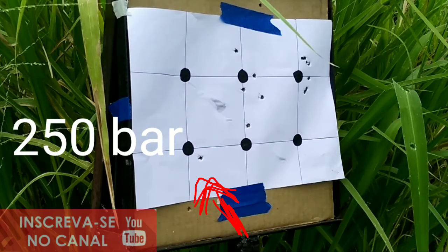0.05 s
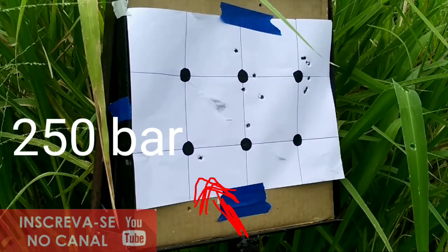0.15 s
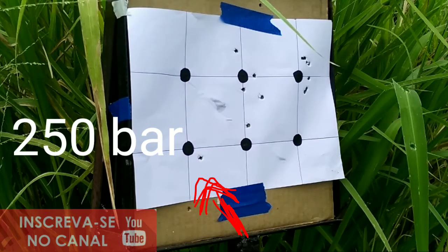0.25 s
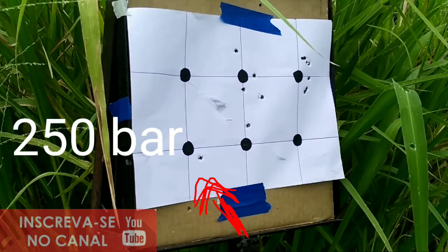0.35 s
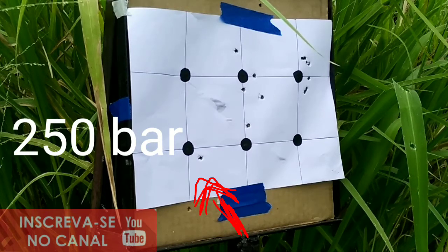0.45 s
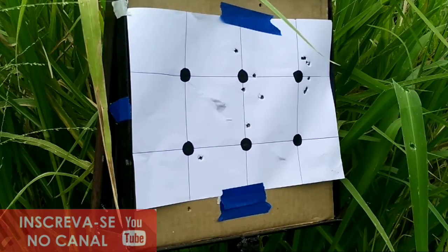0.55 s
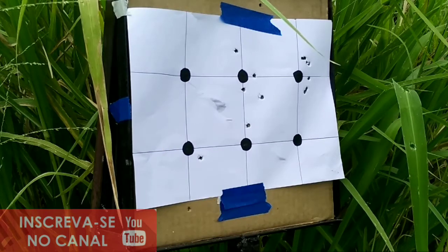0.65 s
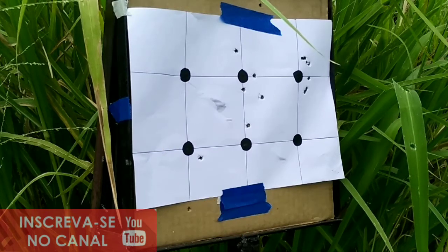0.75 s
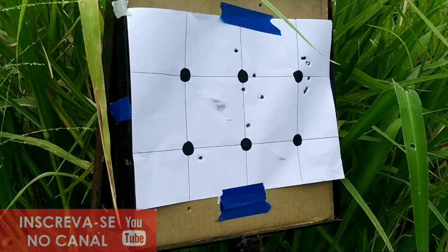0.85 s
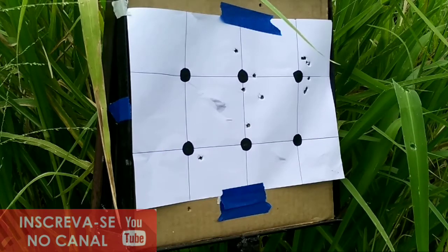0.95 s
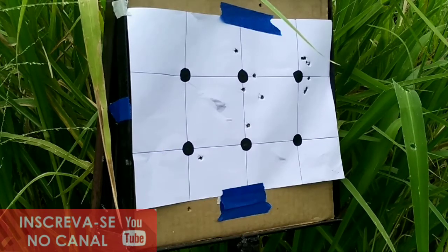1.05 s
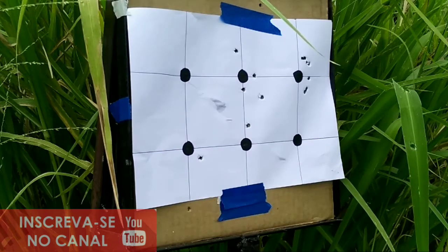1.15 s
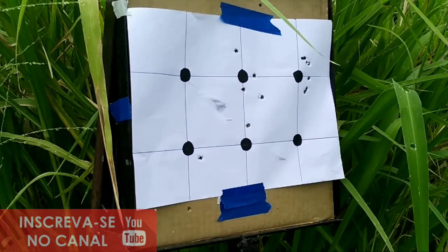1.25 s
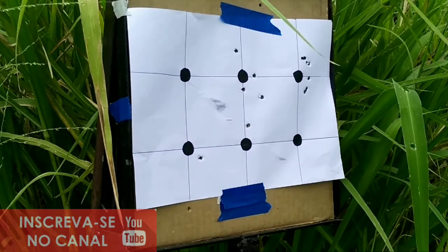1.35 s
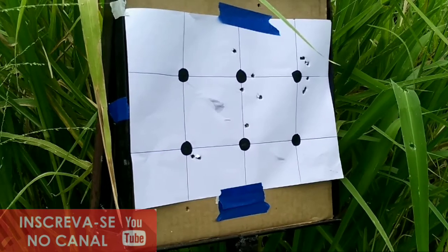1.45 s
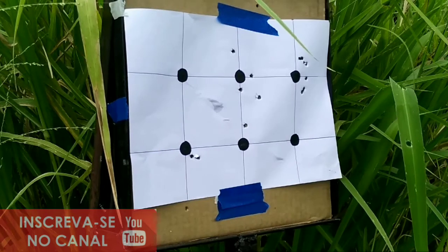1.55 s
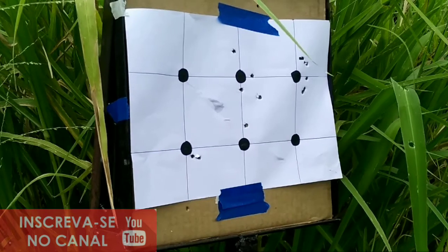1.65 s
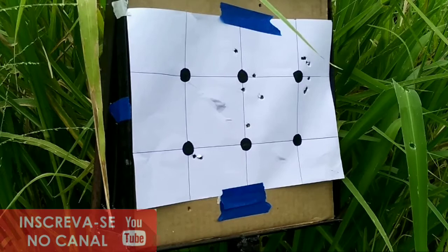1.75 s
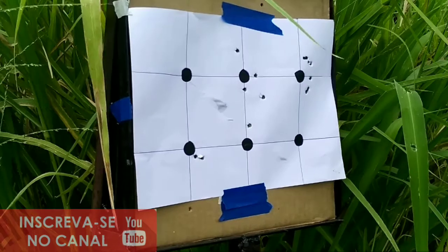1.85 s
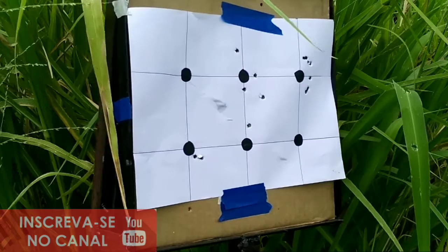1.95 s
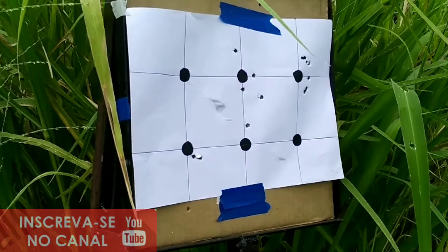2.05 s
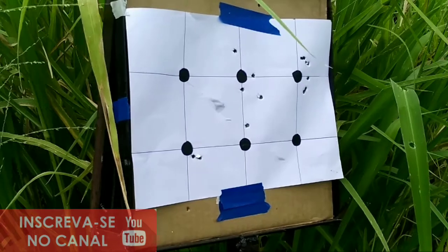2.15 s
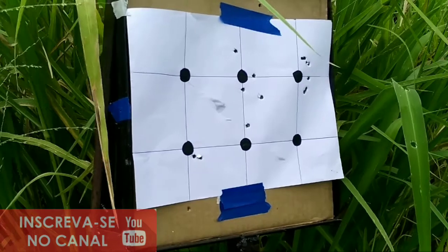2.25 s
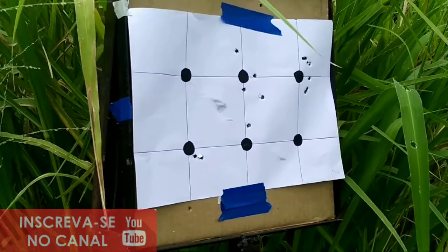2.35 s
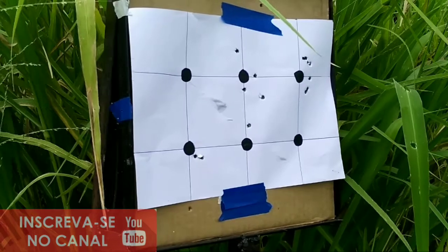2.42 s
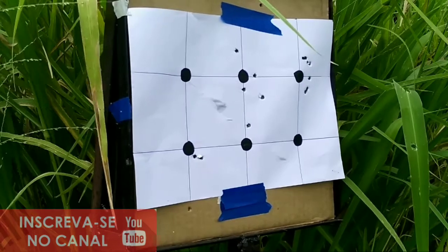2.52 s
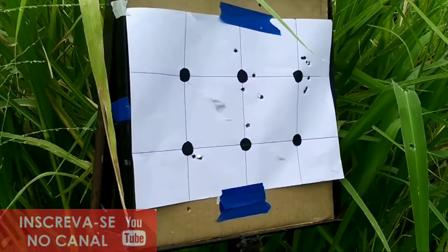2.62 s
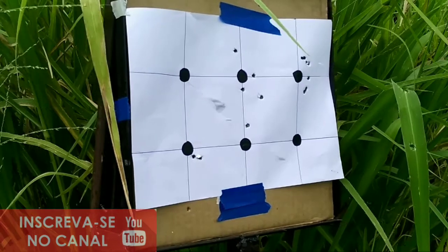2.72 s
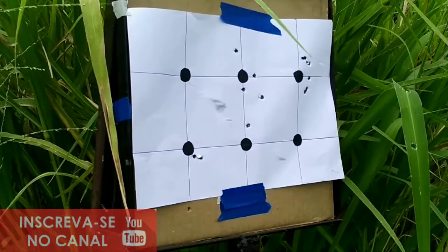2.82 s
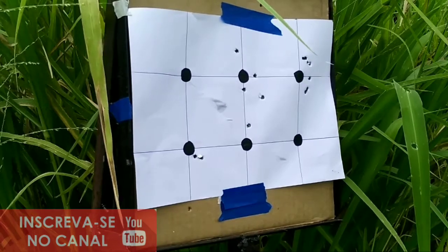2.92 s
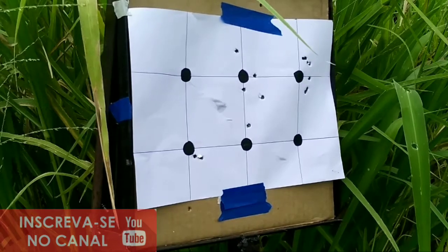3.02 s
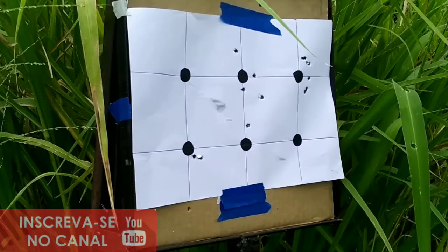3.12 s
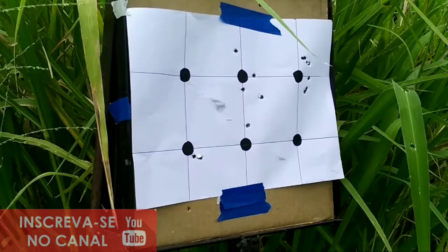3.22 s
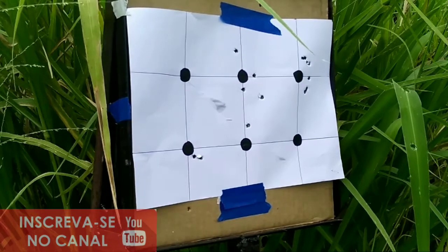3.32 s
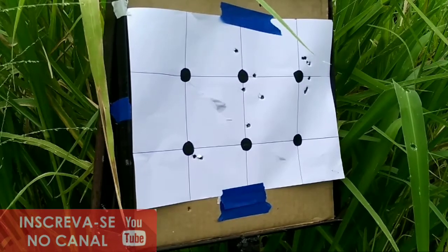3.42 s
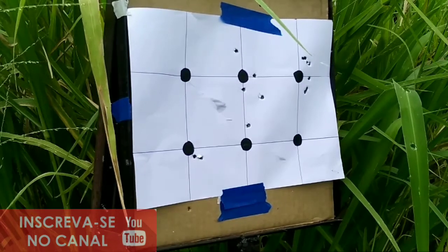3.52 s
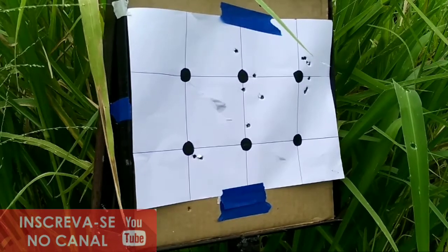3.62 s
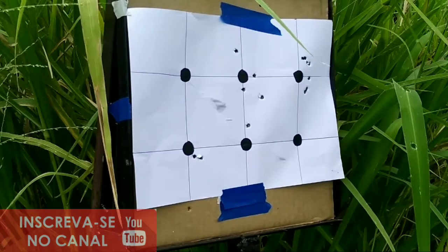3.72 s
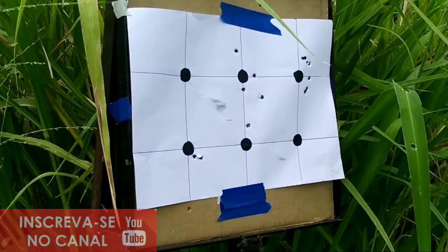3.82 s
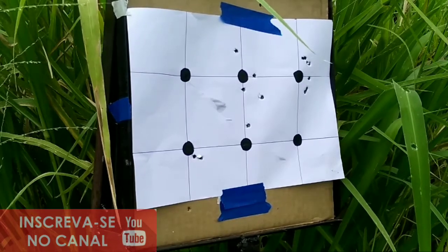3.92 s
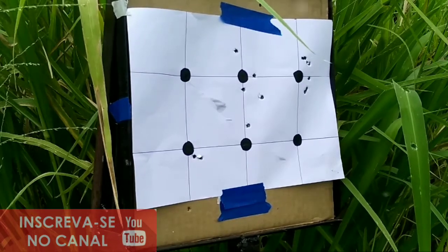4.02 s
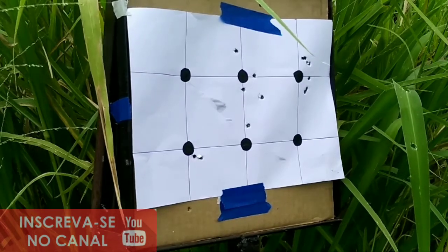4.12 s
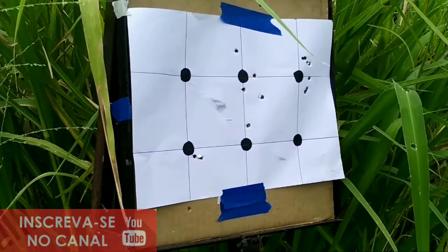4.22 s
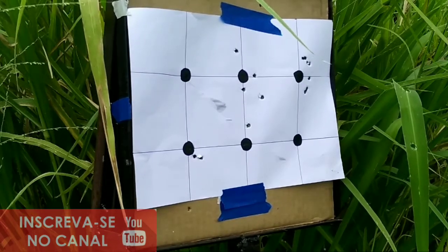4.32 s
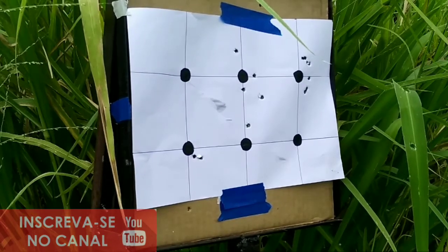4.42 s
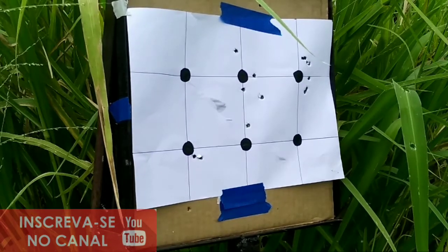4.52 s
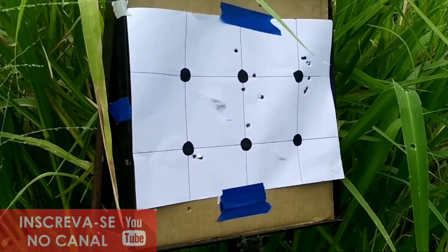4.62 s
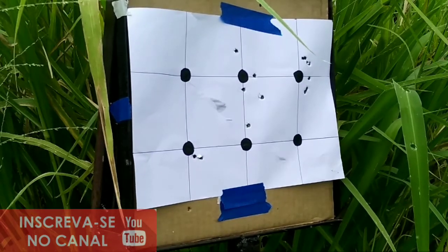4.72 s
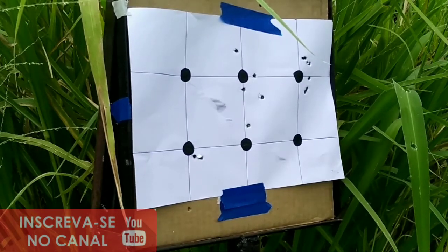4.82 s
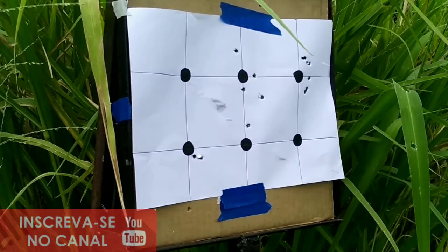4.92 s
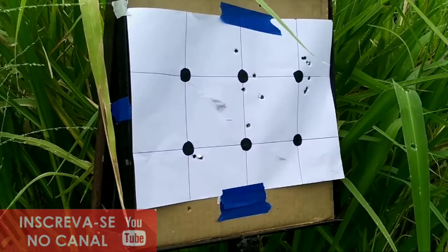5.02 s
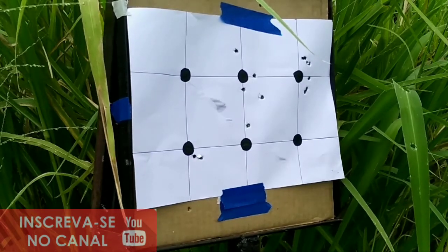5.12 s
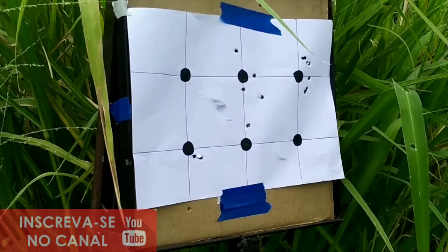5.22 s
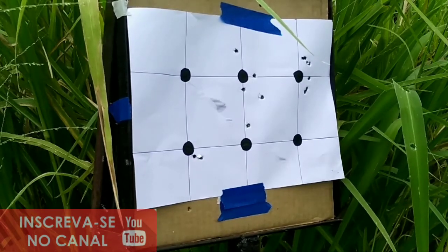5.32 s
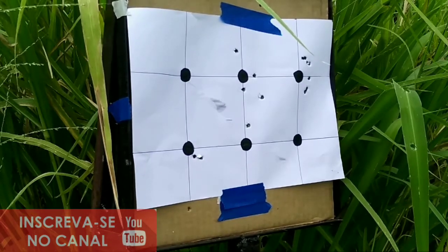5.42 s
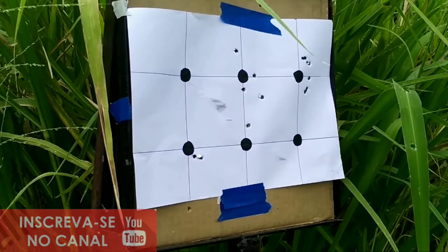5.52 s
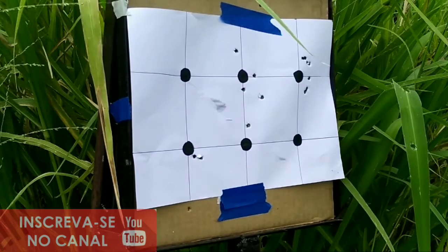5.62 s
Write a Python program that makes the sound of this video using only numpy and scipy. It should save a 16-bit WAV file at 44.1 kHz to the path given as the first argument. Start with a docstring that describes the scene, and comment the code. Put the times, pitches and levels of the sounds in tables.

```python
"""An air-rifle shot in tall grass, from one microphone beside the paper target. Light wind rumbles,
insects chirr in swells and far birds call throughout. About 1.4 s in, the report arrives from the
muzzle; the slower pellet hisses past the microphone, smacks through paper and cardboard and sets a
metal support ringing. Bits patter down as the near grass, then the far trees, answer."""
import sys
import numpy as np
from scipy.fft import rfft, irfft, next_fast_len
from scipy.io import wavfile
from scipy.ndimage import map_coordinates

SR = 44100
rng = np.random.default_rng(int(sys.argv[2]) if len(sys.argv) > 2 else 0)


def wav_out(sig):
    """Save sig, one row per channel (or a flat mono array), as 16-bit PCM at SR to the path in sys.argv[1]."""
    wavfile.write(sys.argv[1], SR, np.round(np.clip(np.atleast_2d(sig).T, -1, 1) * 32767).astype(np.int16))


N = 250047
TIME = np.arange(N) / SR
HIT_S = 1.4995  # the pellet reaches the target

# The report and its sharp near reflections. Each row: start in seconds, level in dB, hold and t60
# in seconds.
CRACKS = [(1.4318, -9, 0.00065, .004), (1.4336, -6, 0.0028, 0.023), (1.4513, -7, 0.00032, 0.0016),
          (1.4557, -16, 0.00033, .004)]
# The spectrum of paper and grass ticking. Each row: frequency in Hz, relative level in dB.
TICK_COLOUR = [(1000, -16), (6000, -18.5), (8700, -3), (11000, -5), (15000, -14)]


def amp(db):
    """Decibels to gain."""
    return 10 ** (np.asarray(db) / 20)


def unit(x):
    """Scale to rms 1."""
    return x / np.sqrt(np.mean(x ** 2) + 1e-20)


def curve(rows):
    """Rows of seconds and value, as one value per sample."""
    return np.interp(TIME, *np.transpose(rows))


def wobble(rate):
    """A smooth random curve, rate knots a second."""
    return map_coordinates(rng.standard_normal(int(N * rate / SR) + 4), [TIME * rate], order=2)


def filtered(x, response):
    """Filter x by a response, a function of frequency in Hz."""
    size = next_fast_len(N + 8192)
    return irfft(rfft(x, size) * response(np.fft.rfftfreq(size, 1 / SR)), size)[:N]


def noise(colour):
    """Noise of rms 1. Each row of colour: frequency in Hz, relative level in dB."""
    hz, db = np.transpose(colour)
    white = rng.standard_normal(N)
    return unit(filtered(white, lambda f: amp(np.interp(np.log(f + 1), np.log(hz), db))))


def burst(start, rise, hold, t60):
    """An envelope that rises, holds and dies away; all times in seconds."""
    age = np.maximum(TIME - start, 0)
    return (1 - np.exp(-age / rise)) * np.exp(-np.log(1000) * np.maximum(age - hold, 0) / t60)


def ring(start, hz, db, t60, rise=.003):
    """One struck mode, slightly unsteady in level and phase."""
    envelope = amp(db + wobble(39.9)) * burst(start, rise, 0, t60)
    return envelope * np.sin(2 * np.pi * hz * TIME + 0.15 * wobble(50))


def stalks(x, wet_db, count=12):
    """Weak reflections from the board and stalks near the microphone comb the treble; rms 1."""
    delays = rng.uniform(.001, .012, count)
    sizes = rng.choice([-1, 1], count) / np.sqrt(count)
    copies = sum(size * np.roll(x, int(delay * SR)) for delay, size in zip(delays, sizes))
    return unit(x + amp(wet_db) * filtered(copies, lambda hz: hz ** 2 / (hz ** 2 + 1500 ** 2)))


def breeze():
    """Light wind over the field: a low rumble and the soft rush of open air."""
    # Each row: time in seconds, relative level in dB.
    rumble_levels = [(0.0, -50.5), (0.3, -54.5), (0.85, -52), (1.1, -55.5), (2.3, -55), (3.1, -55.5),
                     (4.7, -56), (5.67, -55.5)]
    rush_levels = [(0.0, -52), (0.7, -54), (2.3, -53), (4.1, -54.5), (5.67, -53.5)]
    # Each row: frequency in Hz, relative level in dB.
    rumble_colour = [(15, -37), (25, -18), (36, -8), (52, -3.5), (72, 5.5), (100, -9), (140, -11.5),
                     (300, -41.5)]
    rush_colour = [(100, -0.5), (250, -3), (450, -1), (900, -3), (1400, -7), (2200, -13.5), (4000, -15),
                   (6000, -12), (10000, -14.5), (15500, -17.5)]
    rumble = amp(curve(rumble_levels) + 3.5 + 0.78 * wobble(8.4)) * noise(rumble_colour)
    rush = amp(curve(rush_levels) + 0.43 * wobble(12)) * noise(rush_colour)
    return rumble + rush


def chirring(glide_hz_per_s=1800):
    """The insects' effort, swelling about four times a second, and a pitch that climbs in each chirr."""
    # Each row: peak time in seconds, level in dB, half length in seconds, pitch in Hz.
    chirrs = [(0.0, -54.5, .04, 6960), (0.184, -50.5, .06, 7200), (0.438, -50.5, .05, 6996),
              (0.705, -50.5, .048, 7054), (.96, -51.5, .05, 7015), (1.08, -59, .04, 7350),
              (1.223, -51.5, .048, 6974), (1.42, -54, .05, 7300), (2.161, -55, .06, 7000),
              (2.405, -51, .058, 7050), (2.667, -51.5, .062, 7013), (2.89, -52.5, .058, 7130),
              (3.142, -51.5, .055, 7216), (3.35, -51, .045, 7100), (3.582, -48.5, .042, 7023),
              (3.834, -49.5, .052, 7080), (4.071, -52.5, .06, 7180), (4.27, -54, .052, 7097),
              (4.472, -51.5, .06, 6914), (4.698, -53.5, .055, 7146), (4.872, -56, .05, 7050),
              (5.039, -51.5, .05, 7024), (5.256, -54.5, .04, 7130), (5.388, -52, .045, 7080),
              (5.499, -56, .028, 7156), (5.61, -53.5, .04, 7144)]
    peaks, db, half_lengths, hz = np.transpose(chirrs)[:, :, None]
    ages = TIME - peaks
    swells = amp(db) * (np.exp(-.5 * (ages / half_lengths) ** 2) + 1e-9)
    pitches = hz + glide_hz_per_s * np.clip(ages, -2 * half_lengths, 2 * half_lengths)
    effort = swells.sum(0)
    return effort, (swells * pitches).sum(0) / effort


def insects(wander_hz=49.97, held_db=-63.5):
    """Tooth strikes rasp through wing resonances; the same effort drives a shrill rising note."""
    # Each row: resonance in Hz, width in Hz, relative level in dB.
    wing_modes = [(3020, 260, -3), (5100, 1140, -3), (7130, 690, 5), (9480, 910, 3.5), (12500, 800, -4)]

    def wing(f):
        """The wing's resonances, summed with alternating signs."""
        return sum((-1) ** k * amp(db) * 1j * f * width / (hz * hz - f * f + 1j * f * width)
                   for k, (hz, width, db) in enumerate(wing_modes))

    effort, pitch = chirring()
    strikes = rng.standard_normal(N) * amp(1.4 * wobble(700))
    rasp = effort * stalks(filtered(strikes, wing), wet_db=-4.5)
    carrier = np.sin(2 * np.pi * np.cumsum(pitch + wander_hz * wobble(14)) / SR)
    # Slow noise spreads the note into a narrow band round its pitch.
    note = carrier * noise([(20, -7), (200, -9), (420, -8.5), (900, -24), (3000, -61.5)])
    held = amp(held_db + 3.4 * wobble(12))  # the note lasts faintly between chirrs
    shrill = np.hypot(amp(-3.5) * effort, held) * stalks(note, wet_db=-3.5)
    return rasp + shrill


def far_insects():
    """Insects far out in the grass blend to a hiss."""
    # Each row: frequency in Hz, relative level in dB.
    hiss_colour = [(4000, -38), (6200, -23), (6900, 1), (7400, 0.5), (8100, -11), (9900, -2.5),
                   (11000, -17), (15000, -31)]
    return amp(-62.5 + 1.5 * wobble(11)) * stalks(noise(hiss_colour), wet_db=-1.5)


def far_calls():
    """Thin calls of birds and animals glide through three pitches, blurred by distance."""
    # Each row: start and length in seconds, first, middle and last pitch in Hz, level in dB.
    calls = [(0.021, 0.35, 2430, 2640, 2720, -66), (0.25, .1, 1090, 1100, 1090, -62),
             (1.153, 0.27, 2330, 2470, 2620, -69), (1.71, 1.09, 418, 415, 415.6, -62),
             (2.147, 0.28, 412, 415, 417, -53), (3.116, .19, 1480, 1460, 1457, -63),
             (3.412, 0.11, 840, 850, 840, -58), (4.489, .26, 430, 549, 568, -57.5),
             (4.57, .05, 3830, 3880, 3950, -61), (4.801, 0.024, 7400, 6500, 5920, -48),
             (4.906, .13, 560, 520, 435, -57), (4.998, 0.46, 1950, 1932, 1924, -67.5)]
    voices = np.zeros(N)
    blur = .35 * wobble(45)
    fading = amp(1.1 * wobble(24.93))
    for start, length, *pitches, db in calls:
        progress = np.clip((TIME - start) / length, 0, 1)
        hz = np.polyval(np.polyfit([0, .5, 1], pitches, 2), progress)
        swell = np.minimum(1, 10 * np.minimum(progress, 1 - progress))
        voices += amp(db) * swell * np.sin(2 * np.pi * np.cumsum(hz) / SR + blur)
    return voices * fading


def report():
    """The muzzle crack as it reaches the target, and its scatter off the grass."""
    # Each row: frequency in Hz, relative level in dB.
    crack_colour = [(20, -41), (60, -12), (170, -7), (430, -35.5), (800, -18), (1300, -13), (1600, -5.5),
                    (2400, -9.5), (3550, 1.5), (4400, -8.5), (5600, 0.5), (7700, -2.5), (11000, -9.5),
                    (15200, -20)]
    scatter_colour = [(59, -52), (100, -21), (222, -20.5), (427, -36.5), (1820, -6.5), (2250, -11.5),
                      (2830, -3.5), (3970, -4.5), (4600, -8.5), (10200, 0), (15200, -9)]
    arrivals = sum(amp(db) * burst(start, .0001, hold, t60) for start, db, hold, t60 in CRACKS)
    crack = noise(crack_colour) * arrivals
    scatter = amp(-14.0) * noise(scatter_colour) * burst(CRACKS[1][0], 0.0084, hold=0.0047, t60=0.27)
    return crack + scatter


def pellet(pass_s=1.492, approach_db_per_s=681, leave_db_per_s=900):
    """The pellet's fluttering hiss peaks as it passes the microphone, just short of the target."""
    # Each row: frequency in Hz, relative level in dB.
    flight_colour = [(300, -26.5), (2000, -22.5), (6000, -21), (8000, -5), (10500, 1), (13000, -4),
                     (15500, -1)]
    flying = (TIME > CRACKS[0][0]) & (TIME < HIT_S)
    away_db = np.maximum(approach_db_per_s * (pass_s - TIME), leave_db_per_s * (TIME - pass_s))
    return flying * amp(-6 - away_db + wobble(500)) * noise(flight_colour)


def target_smack():
    """Close by, paper and cardboard tear in a dense crackle and the board thuds in its dull modes."""
    # Each row: frequency in Hz, relative level in dB.
    tear_colour = [(20, -41), (80, -17), (250, -10), (700, -10), (1300, -7), (2000, -3), (3000, -8.5),
                   (3700, -4), (5800, -6.5), (8000, -1), (10500, 1), (15200, -5.5)]
    # Each row: frequency in Hz, level in dB, t60 in seconds.
    board_modes = [(41, -32, 0.23), (173.4, -13, 0.043), (316.1, -11, 0.041), (425, -14, 0.04),
                   (662, -11, .04), (1040, -8.5, 0.038)]
    crackle = amp(-0.5 + 1.6 * wobble(900)) * stalks(noise(tear_colour), wet_db=-10)
    tear = crackle * burst(HIT_S, .0001, hold=0.0083, t60=0.089)
    thud = sum(ring(HIT_S + 0.003, *mode, rise=0.00073) for mode in board_modes)
    return tear + thud


def metal_support():
    """The struck support rings until it is damped; a few notes ring on after it settles."""
    # Each row: frequency in Hz, level in dB, undamped t60 in seconds.
    modes = [(519, -29.5, 0.65), (726, -37, 0.89), (842, -39, 0.54), (1217, -31.5, 0.57),
             (2028, -19.5, 0.38), (2620, -44, 0.98), (4060, -38, .5), (6720, -33, 0.65), (7350, -31, .45),
             (7750, -20, 0.24)]
    # Each row: start in seconds, frequency in Hz, level in dB, t60 and rise in seconds.
    lingering_notes = [(1.56, 2902, -35, 0.69, 0.022), (1.607, 2908, -31.5, 0.24, 0.0074),
                       (1.849, 2600, -53, 0.71, .01)]
    damping = burst(HIT_S, 0.0011, hold=0.15, t60=0.15)
    struck = damping * sum(ring(HIT_S, *mode) for mode in modes)
    return struck + sum(ring(*note) for note in lingering_notes)


def debris(per_second=160, spread_db=7.0):
    """Bits patter down from the target in tiny ticks of unequal size."""
    landings = rng.random(N) < per_second / SR
    ticks = landings * rng.choice([-1, 1], N) * amp(spread_db * rng.uniform(-1.12, 1, N))
    hz, db = np.transpose(TICK_COLOUR)
    patter = unit(filtered(ticks, lambda f: amp(np.interp(f, hz, db))))
    return amp(-46.5) * patter * burst(HIT_S, .03, hold=0.083, t60=2.3)


def field_tail():
    """Near grass returns a bright tail, far trees a duller one."""
    # Each row: frequency in Hz, relative level in dB.
    grass_colour = [(150, -24.5), (430, -18), (800, -6.5), (1600, -5.5), (2300, -7), (4000, -7), (5500, -6),
                    (7500, -1.5), (10500, 0), (13000, -6.5), (15200, -9)]
    tree_colour = [(300, -17.5), (600, -12), (1900, -5), (2700, -4), (4700, -3), (7500, -2), (10500, -5),
                   (13000, -16), (15200, -18)]
    grass = amp(-28.0 + 0.99 * wobble(200) + 1.2 * wobble(720)) * stalks(noise(grass_colour), wet_db=-7)
    trees = amp(-48 + 1.6 * wobble(120)) * stalks(noise(tree_colour), wet_db=-6)
    near = grass * burst(HIT_S, 0.015, hold=0.083, t60=0.72)
    far = trees * burst(HIT_S, .05, hold=0.54, t60=0.98)
    return near + far


def snaps():
    """Torn paper and grass blades snap and tick after the hit."""
    # Each row: start in seconds, level in dB, t60 in seconds.
    ticks = [(1.5297, -23, .004), (1.7464, -27.5, 0.052), (1.8066, -47, .05), (2.274, -46, .008),
             (2.597, -45, 0.0073), (2.69, -36.5, 0.013), (2.95, -50, .007), (3.332, -49, .007)]
    envelope = sum(amp(db) * burst(start, 0.00045, 0.002, t60) for start, db, t60 in ticks)
    return noise(TICK_COLOUR) * envelope


def echoes():
    """Bushes and trees at the field's edges send back a few smeared echoes."""
    # Each row: start in seconds, level in dB, t60 in seconds, centre frequency in Hz.
    returns = [(1.632, -24.5, 0.069, 9300), (1.663, -30, 0.087, 7900), (1.72, -34, .1, 7500),
               (1.841, -36.5, 0.22, 6640), (1.9018, -32.5, 0.057, 7600), (2.03, -47, .25, 7500)]
    reflected = np.zeros(N)
    for start, db, t60, hz in returns:
        leaves = noise([(200, -30), (hz / 4, -17), (hz / 2, -7), (hz, 0), (1.57 * hz, -7), (2 * hz, -24)])
        reflected += amp(db) * burst(start, 0.0028, 0.004, t60) * leaves
    return reflected * amp(1.5 * wobble(400))


def scene():
    """The shot and the open field, at one microphone beside the target."""
    shot = report() + pellet() + target_smack() + metal_support()
    aftermath = snaps() + debris() + field_tail() + echoes()
    ambience = insects() + far_insects() + far_calls() + breeze()
    return (ambience + shot + aftermath)[None]


def record(dry, top_hz=15550):
    """The loudest cracks flatten at full scale, and nothing is kept above the band limit."""
    clipped = dry[0] / (1 + np.abs(dry[0]) ** 6) ** (1 / 6)
    return filtered(clipped, lambda hz: 1 / (1 + (hz / top_hz) ** 300))[None]


dry = scene()
out = record(dry)
wav_out(out)
```